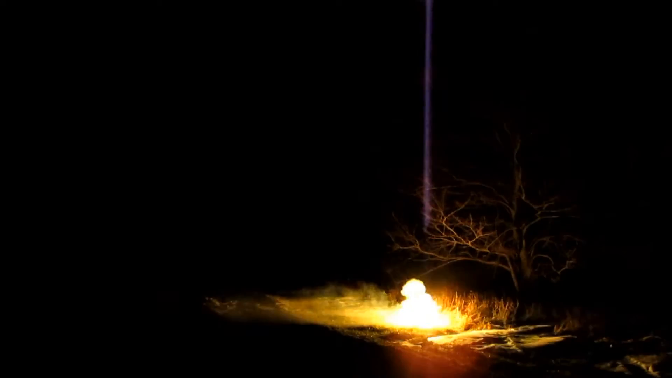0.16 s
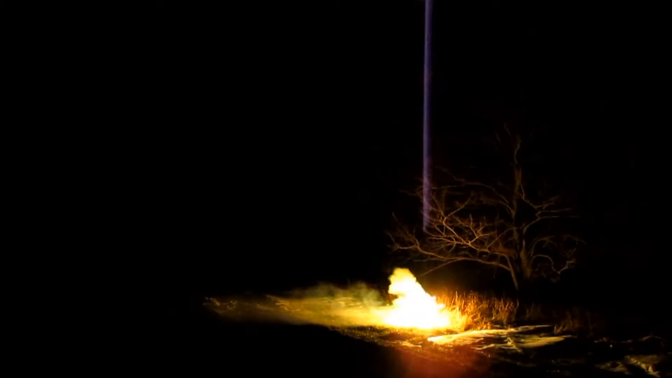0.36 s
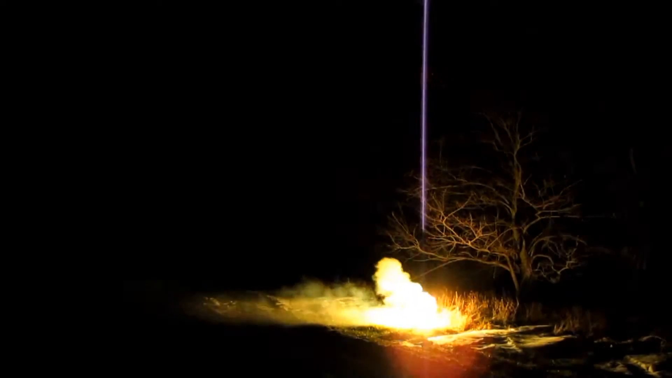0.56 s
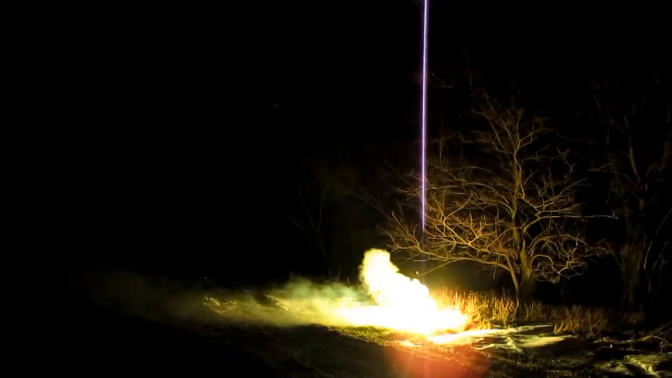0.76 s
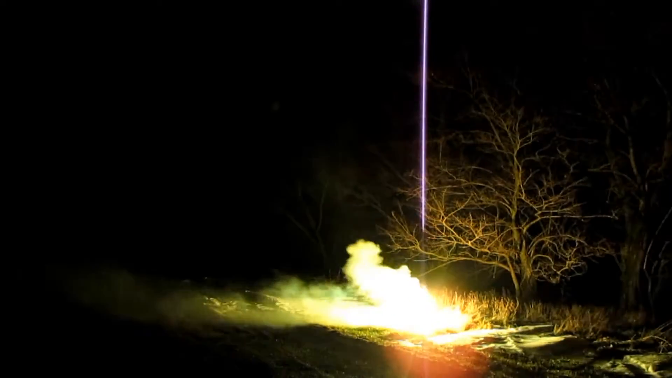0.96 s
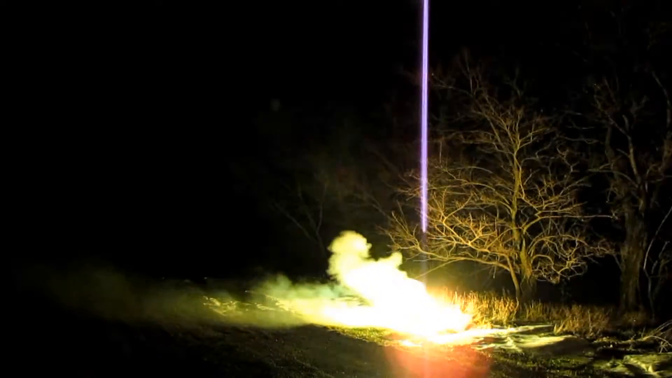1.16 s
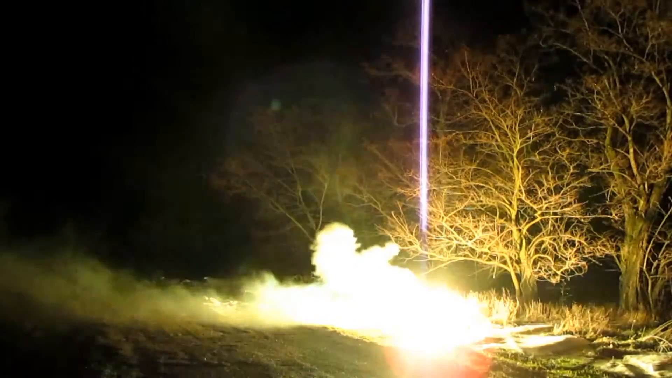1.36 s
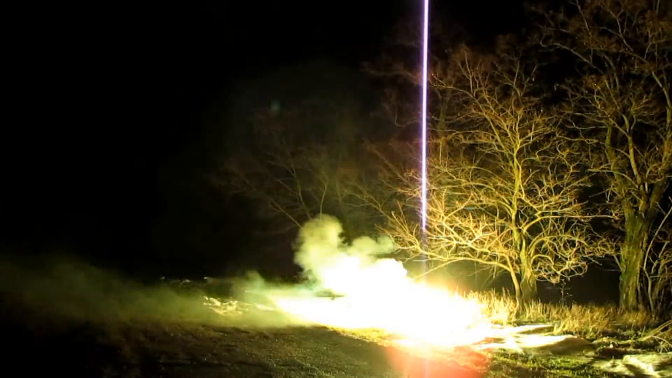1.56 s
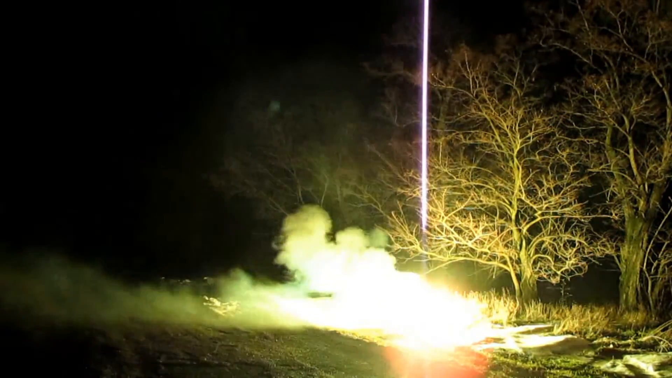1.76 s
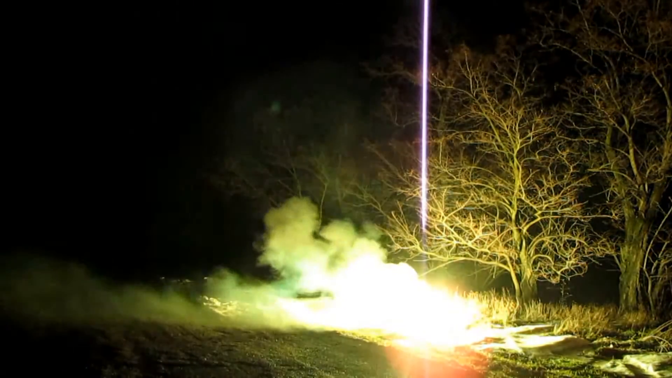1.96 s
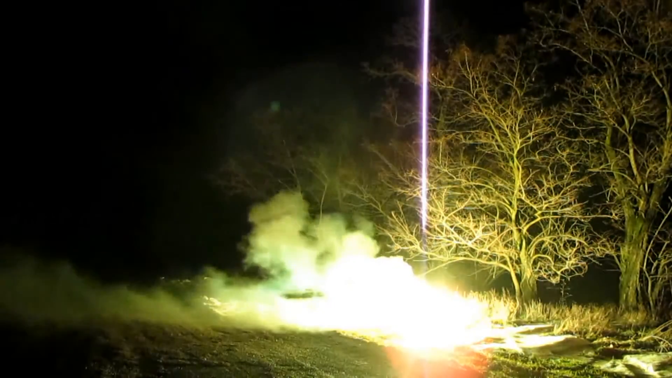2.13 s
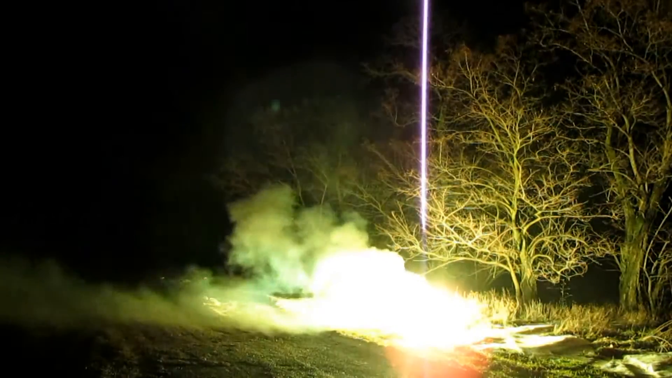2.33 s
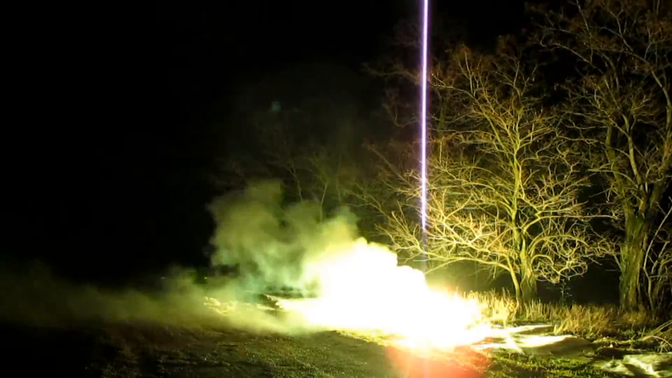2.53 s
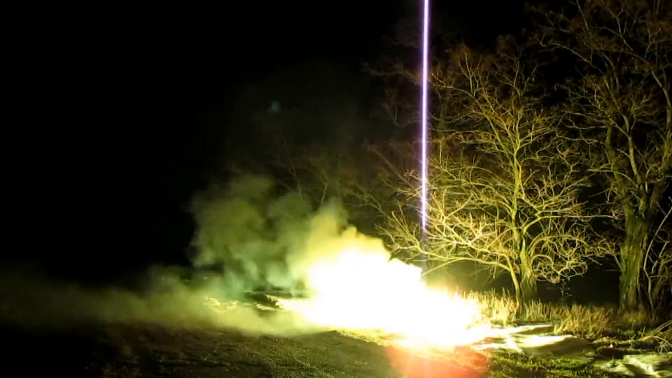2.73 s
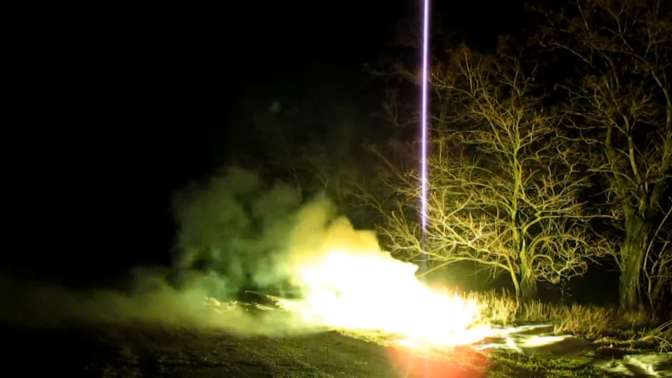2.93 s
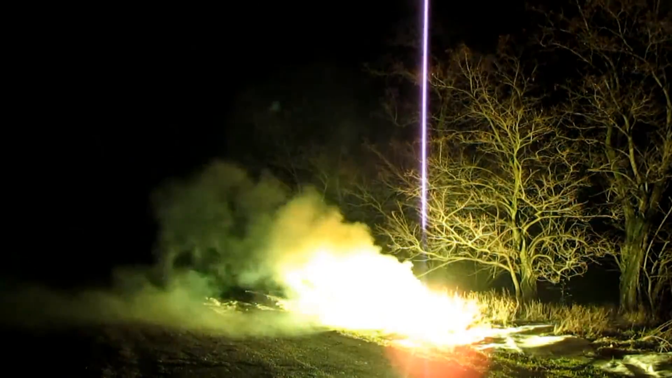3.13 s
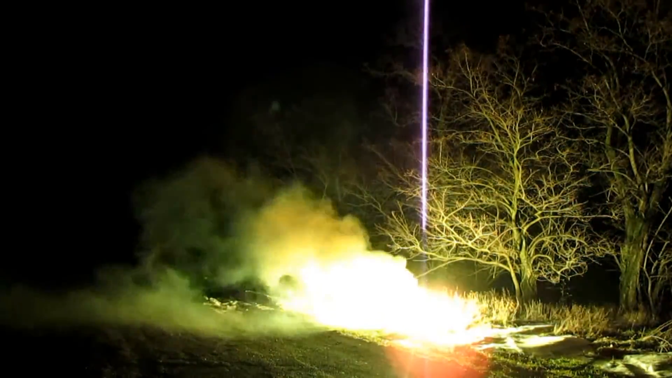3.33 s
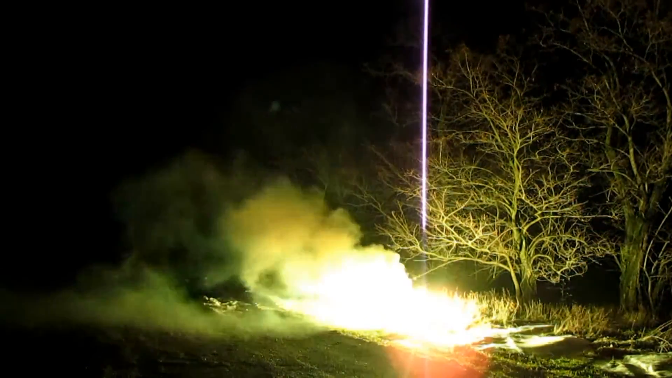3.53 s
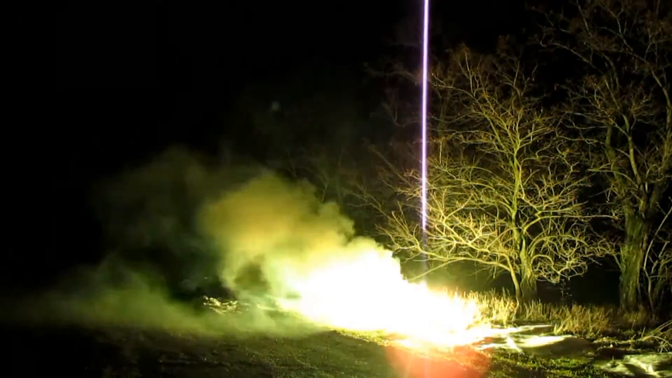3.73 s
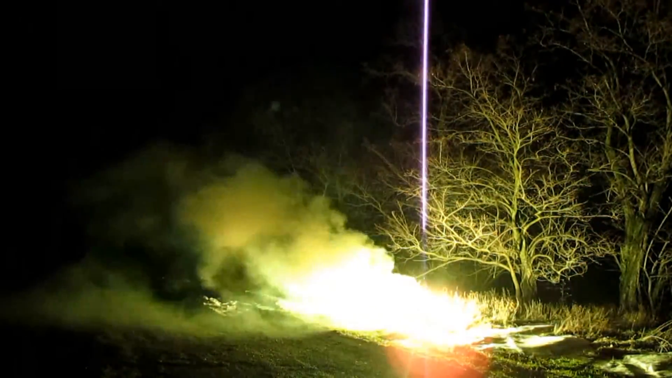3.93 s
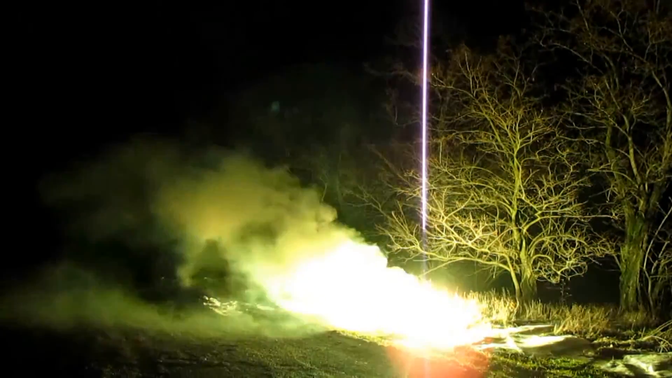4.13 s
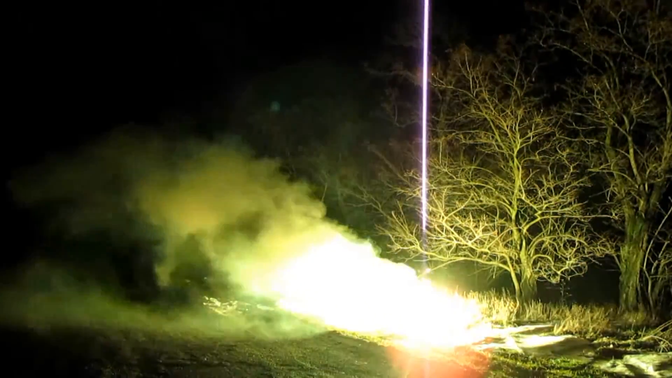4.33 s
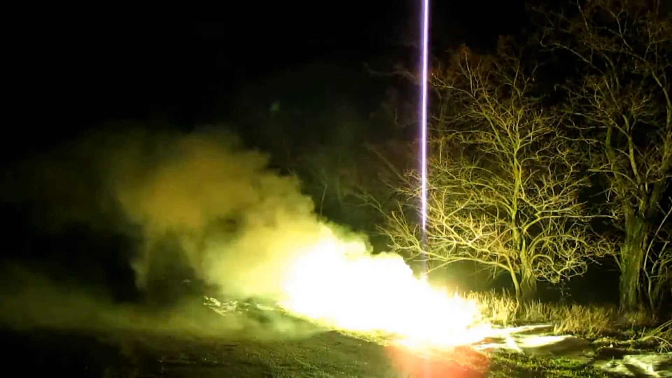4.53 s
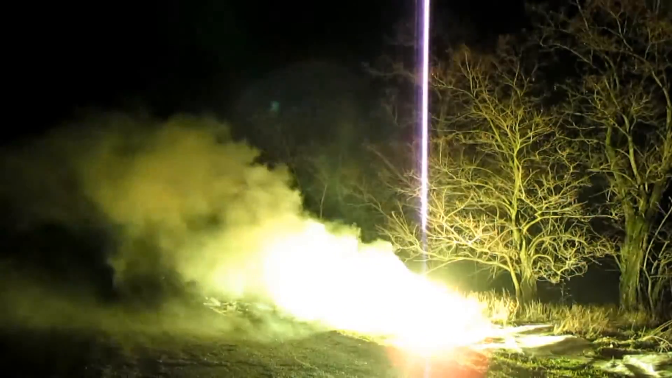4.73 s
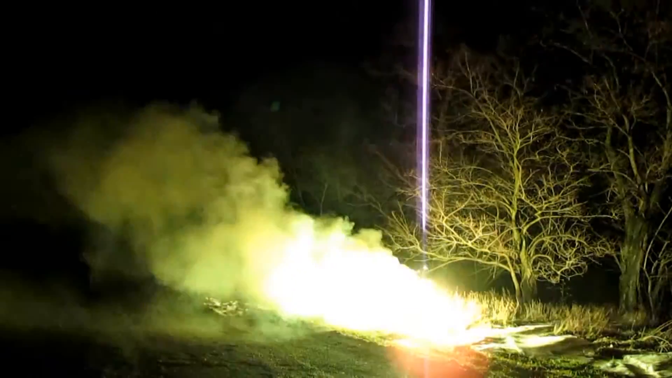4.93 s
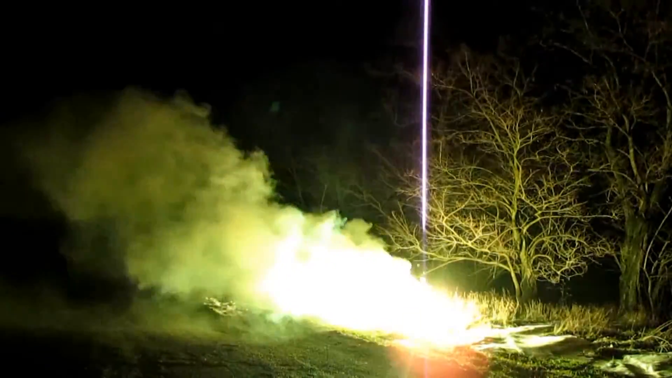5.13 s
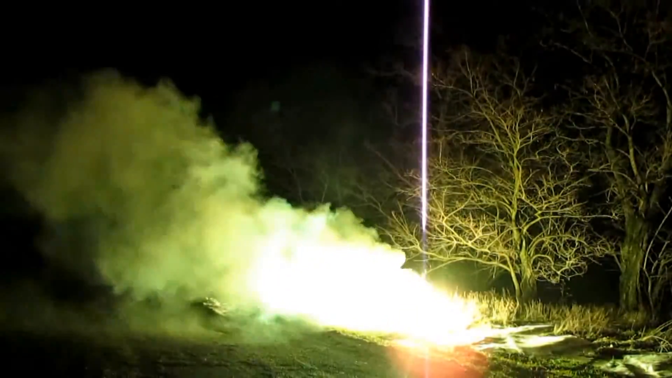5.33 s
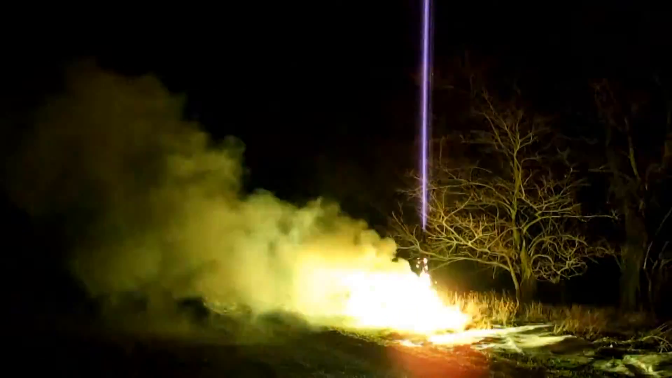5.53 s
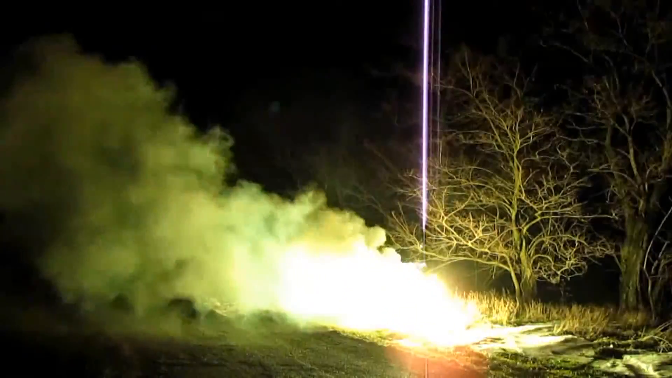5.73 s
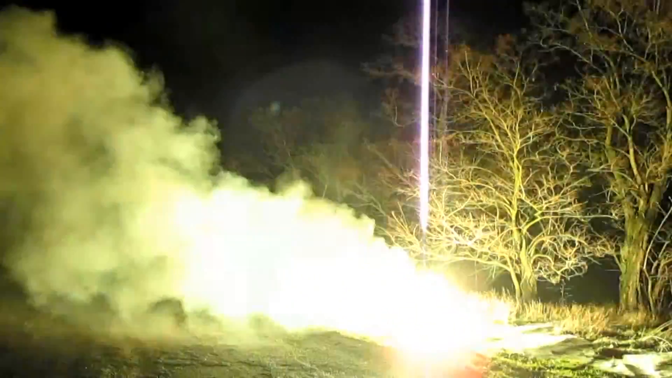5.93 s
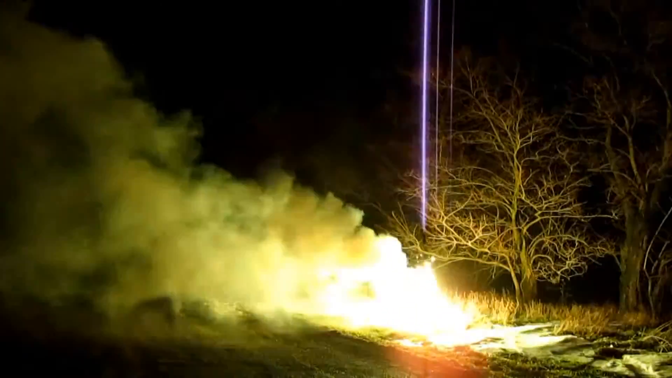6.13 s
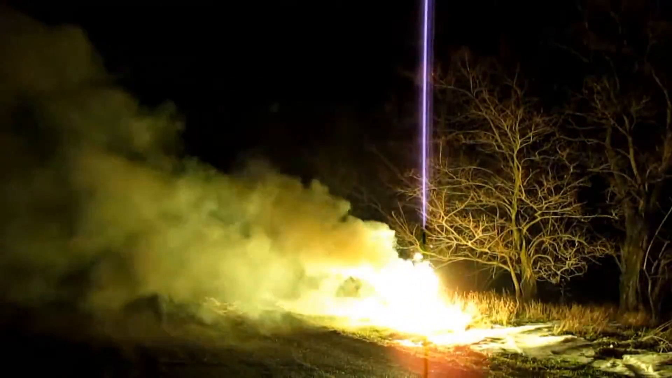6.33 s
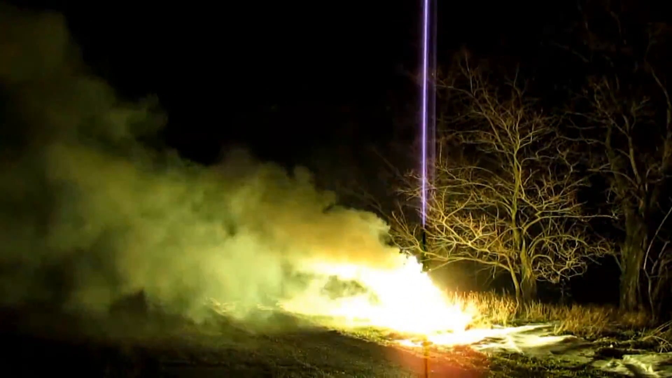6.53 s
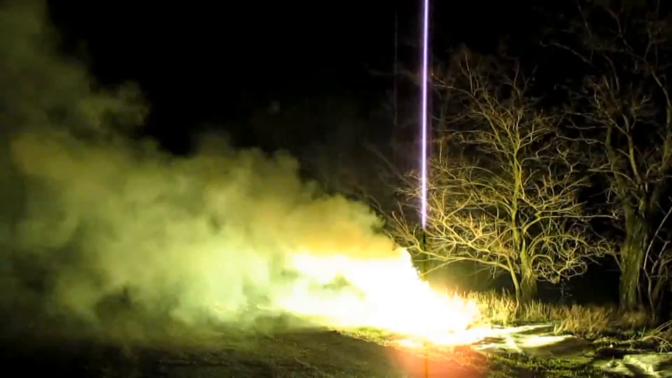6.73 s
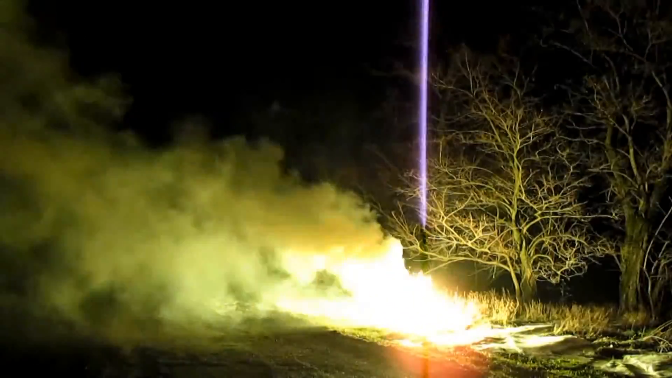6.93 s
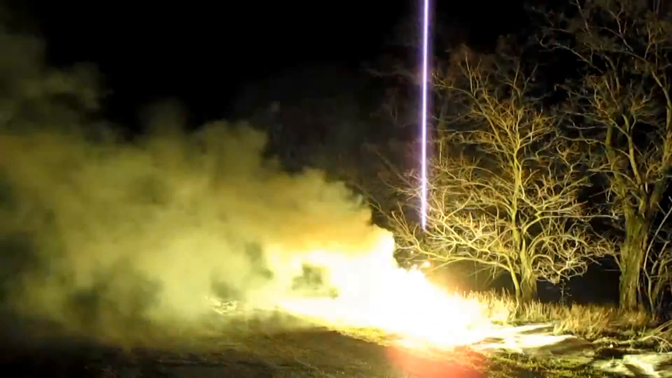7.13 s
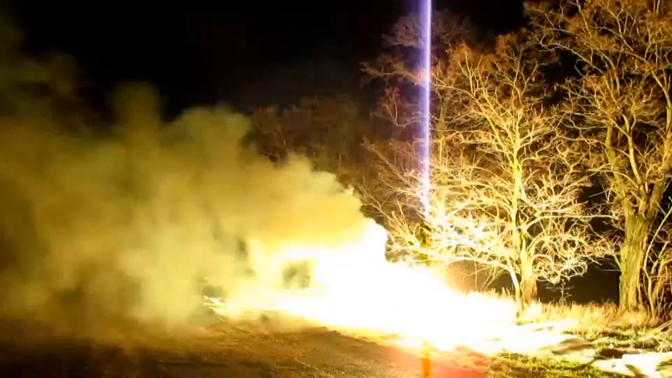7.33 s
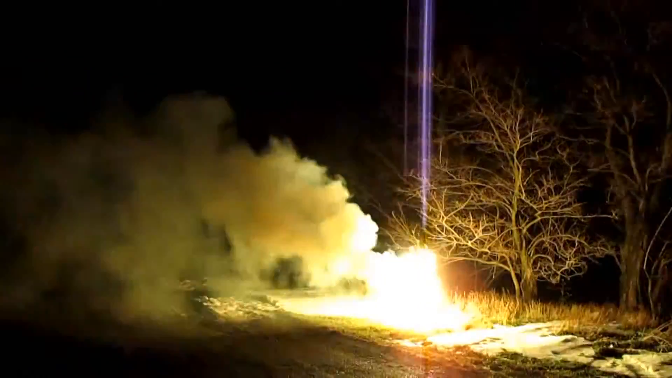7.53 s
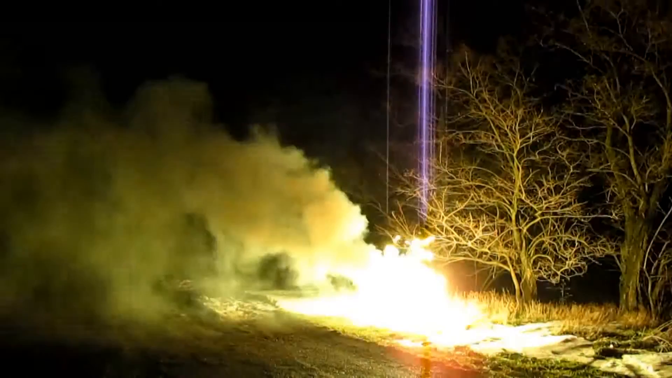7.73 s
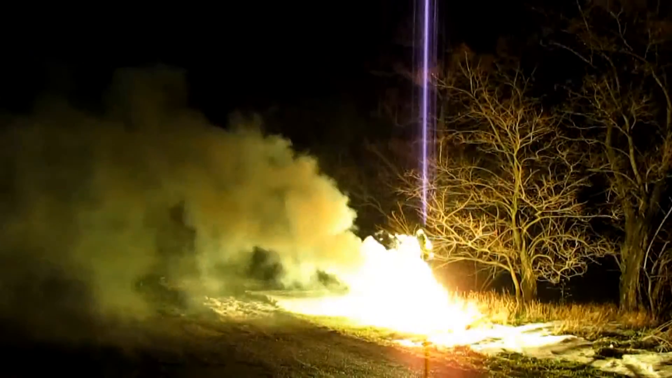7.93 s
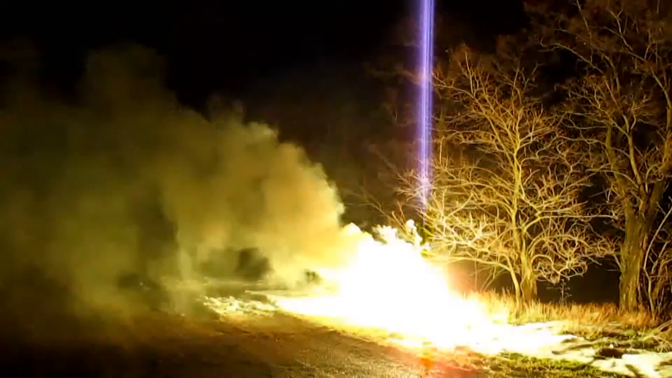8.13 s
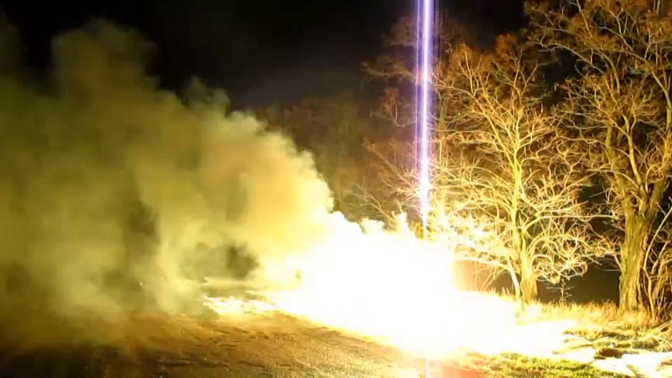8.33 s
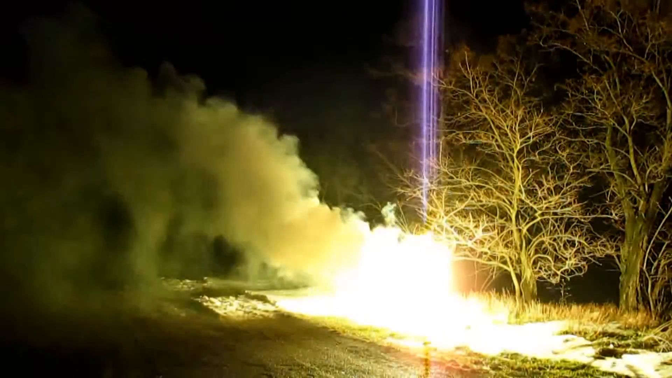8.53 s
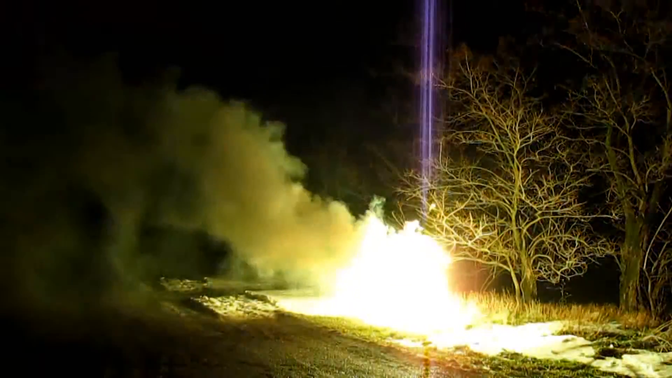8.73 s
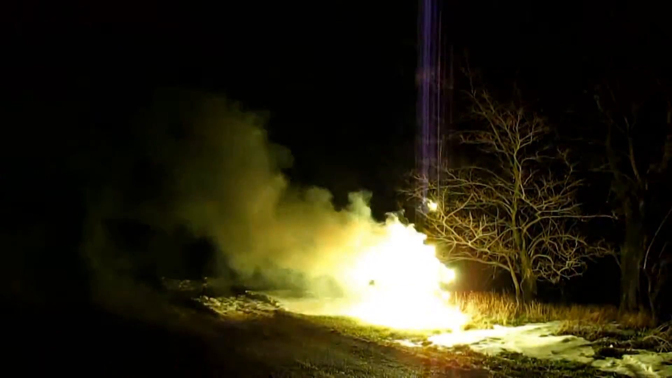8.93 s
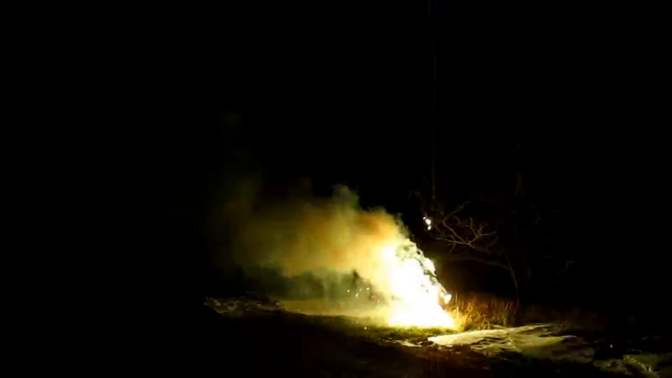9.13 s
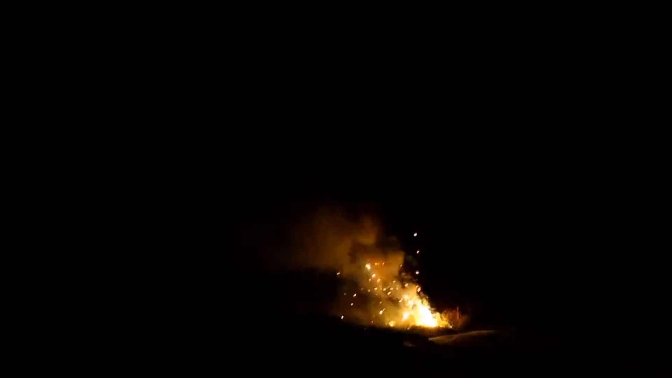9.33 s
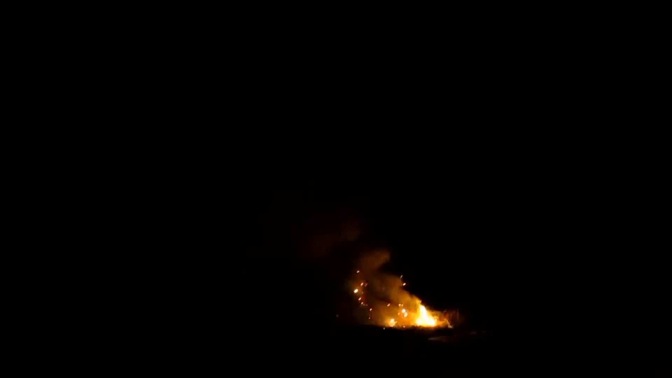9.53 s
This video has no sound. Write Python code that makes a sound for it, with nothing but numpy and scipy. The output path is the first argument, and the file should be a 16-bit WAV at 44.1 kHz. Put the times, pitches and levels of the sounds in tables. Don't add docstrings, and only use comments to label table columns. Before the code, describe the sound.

Dense crackling gas hiss and low flame roar from a burning flare, growing rougher and louder over nine seconds before cutting off to near silence.

```python
import sys
import numpy as np
from scipy import signal
from scipy.fft import rfft, irfft, next_fast_len
from scipy.io import wavfile

SR = 44100
rng = np.random.default_rng(int(sys.argv[2]) if len(sys.argv) > 2 else 0)


def file_out(sig):
    cols = np.atleast_2d(sig).T
    lim = np.clip(cols, -1, 1)
    pcm = np.round(lim * 32767).astype(np.int16)
    wavfile.write(sys.argv[1], SR, pcm)


def volts_from_db(level):
    exponent = np.asarray(level, float) / 20
    return 10 ** exponent


N = 422125
SIZE = next_fast_len(N + 4096)
HZ = np.maximum(np.arange(SIZE // 2 + 1) * SR / SIZE, 1)
CONTROL_STEP = 64


def rms_one(x):
    return x / np.sqrt(np.mean(x ** 2) + 1e-20)


def at_hz(points, hz):
    points = np.array(points)
    return np.interp(np.log(hz), np.log(points[:, 0]), points[:, 1])


def drift(rate_hz):
    r = np.exp(-2 * CONTROL_STEP * np.pi * rate_hz / SR)
    noise = rng.standard_normal(N // CONTROL_STEP + 1502)
    settled = signal.lfilter([1], [1, -2 * r, r * r], noise)[1500:]
    return rms_one(settled)


def humps(t, start, rise, end, fall, db):
    up = (t[:, None] - start) / np.maximum(rise, .005)
    down = 1 - (t[:, None] - end) / max(fall, .005)
    return np.clip(np.minimum(up, down), 0, 1) @ db


# (frequency [Hz], likeness [0-1])
PORT_LIKENESS = [(30, 0.4), (80, 0.86), (130, 0.98), (290, 0.99), (640, 0.96), (1200, 0.77), (3000, 0.94),
                 (8000, 1), (14000, .87)]
# (frequency [Hz], left over right [dB])
BODY_SHADE = [(60, -3), (110, 1.5), (200, 0), (380, 1), (700, 1), (1290, -1.0), (2380, -2.5), (4400, -2),
              (8120, -1.5), (15000, -3.5)]


def ports(shared, own):
    left_lag_s = 3.7e-5
    alike = np.clip(at_hz(PORT_LIKENESS, HZ), 0, 1)
    common = np.sqrt(.5 + .5 * alike) * shared
    unlike = np.sqrt(.5 - .5 * alike) * own * [[1], [-1]]
    shade = volts_from_db(at_hz(BODY_SHADE, HZ) / 2)
    left = shade * np.exp(-2j * np.pi * HZ * left_lag_s)
    return (common + unlike) * [left, 1 / shade]


# (time [s], pressure as hiss level [dB], plume breadth as flanks over core [dB])
JET = [(0, -42, -3), (.2, -42.5, -7), (.55, -41.5, -7), (1.2, -41, -6.5), (1.678, -40, -4.5),
       (2.02, -38, -6.5), (2.13, -35.5, -5), (3.0, -35.5, -11), (4.35, -38, -6), (4.65, -36, -4.5),
       (5.3, -36, -3.5), (6.9, -38, -0.5), (7.7, -33, -0.5), (8.1, -33, -1.5), (8.65, -28.5, -1),
       (9.19, -36.5, -1), (9.33, -44, -1.5), (9.57, -51, -6)]
# (time [s], roar level [dB])
FLAME = [(0, -47.5), (.55, -45.5), (1.3, -45), (2, -46), (2.85, -46), (2.95, -46), (4, -42), (4.5, -40.5),
         (5.6, -42), (6.2, -41), (7.5, -41.5), (8.3, -36.5), (8.85, -38), (9.19, -45), (9.33, -48.5),
         (9.57, -56)]
# (start [s], length [s], pressure change [dB], extra sizzle [dB])
SPURTS = [(.05, .07, -2.5, 3), (0.226, 0.22, 3.5, 2), (.67, 0.059, 1, 1), (1.232, .04, 2.5, 4),
          (1.28, .09, -0.5, 4.5), (1.376, .11, 3.5, 2), (1.74, 0.29, 0, 2), (2.696, 0.069, 0.5, -3),
          (2.84, 0.11, -0.5, 4), (3.275, .08, -2, 0), (3.39, 0.14, 1, 2), (4.057, 0.12, 2.5, -1.5),
          (4.53, 0.014, 1, 4), (4.72, .1, 1.5, 1.5), (5.493, 0.03, 2.5, -2.5), (5.958, 0.035, 1.5, -0.5),
          (6.01, .05, 2.5, 0), (6.116, 0.059, 2.5, 1), (6.194, 0.37, 2, -0.5), (6.79, .06, 0.5, -0.5),
          (6.978, .05, 2, -0.5), (7.84, 0.037, -2, -2), (8.037, 0.039, 0, -1.5), (5.027, .44, -2, -.5),
          (7.077, .25, 0.3, -2), (2.04, .13, 1.5, -0.6), (0.624, 0.44, 0.9, 1), (1.606, 0.11, -0.5, -2.5),
          (8.12, 0.11, -0.3, 2.5)]
# (blow-out time [s], build-up [s], gain [dB])
SWELLS = [(.3, 0.089, 2), (1.25, 0.68, 3.5), (1.25, .34, 1.5), (4.38, 0.24, 1.5), (4.79, 0.058, 1),
          (5.12, 0.15, 3), (5.33, 0.21, 2), (5.55, 0.23, 4), (6.07, 0.34, 4.5), (6.37, 0.065, 3),
          (6.5, .08, 0.5), (6.99, 0.54, 3), (2.99, 0.11, 1.5), (7.26, .12, 5.5), (7.4, 0.12, 5.5),
          (7.76, 0.24, 3), (8.0, .12, 1.5), (8.11, 0.056, -2), (8.3, 0.1, 4), (8.45, 0.15, 3.5),
          (8.76, 0.22, 5.5), (8.52, 0.086, 3.5), (9.09, .08, 2.5)]
# (time [s], echo strength [0-1], shade [dB])
SNOW_BANK = [
    (3.0, .06, -0.5),
    (3.55, .03, -1),
    (3.7, .5, -3.5),
    (3.93, 0.5, -7.5),
    (4.06, 0.3, -0.1),
    (4.4, .07, 0),
]


def burn(t):
    s, pressure, breadth = np.transpose(JET)
    pressure = np.interp(t, s, pressure)
    breadth = np.interp(t, s, breadth)
    flame = np.interp(t, *np.transpose(FLAME))

    start, length, push_db, sizzle_db = np.transpose(SPURTS)
    rise_s, fall_s = 0.018, 0.027
    push = humps(t, start, rise_s, start + length, fall_s, push_db)
    sizzle = humps(t, start, rise_s, start + length, fall_s, sizzle_db)

    end, build, gain = np.transpose(SWELLS)
    rise_share, blow_out_s = 0.29, 0.019
    swell = humps(t, end - build, rise_share * build, end, blow_out_s, gain)

    s, _, shade = np.transpose(SNOW_BANK)
    shade = np.interp(t, s, shade)
    flank = pressure + 0.62 * shade
    lit = flank + 0.25 * (flame - flank)
    low_flank = lit - 4 + 0.75 * breadth + 0.42 * push + 0.37 * swell
    smoulder_db = -52
    return np.array([flame + swell,
                     np.maximum(low_flank, smoulder_db),
                     pressure + shade + push,
                     flank + breadth + push + sizzle])


def turbulence(crackle_per_s, spread_db, share):
    heights = volts_from_db(spread_db * np.minimum(rng.exponential(1, SIZE), 3))
    spikes = (rng.random(SIZE) < crackle_per_s / SR) * heights
    crackle = rms_one(spikes - spikes.mean())
    share = np.clip(share, 0, 1)
    return np.sqrt(1 - share) * rng.standard_normal(SIZE) + np.sqrt(share) * crackle


BURN_HZ = [
    450,
    1500,
    4300,
    10500,
]
# (frequency [Hz], density [dB per Hz])
GAS_COLOUR = [(25, -47), (60, -36.5), (127, -31.5), (240, -29), (500, -31), (800, -32.5), (1150, -33),
              (1700, -32.5), (2500, -32), (4000, -33.5), (7200, -31.5), (8500, -33.5), (13500, -36),
              (15700, -38)]


def flare(roar_flicker_db, jet_flicker_db, patch_db):
    steps = np.arange(N // CONTROL_STEP + 2) * CONTROL_STEP
    levels = burn(steps / SR)
    crackling = turbulence(crackle_per_s=900.0, spread_db=1.5, share=0.059)
    gas = ports(rfft(crackling), rfft(rng.standard_normal(SIZE)))
    gas = gas * volts_from_db(at_hz(GAS_COLOUR, HZ)) * np.sqrt(SR / 2)
    roar = drift(10.3)
    jet = 0.22 * drift(24.0) + 1.08 * drift(28.0)
    neighbour = drift(9.0)
    out = np.zeros((2, N))
    for centre in 25 * 2 ** np.arange(0, 10, .5):
        window = np.cos(np.pi / 2 * np.clip(2 * np.log2(HZ / centre), -1, 1))
        place = np.interp(np.log(centre), np.log(BURN_HZ), np.arange(4))
        weights = np.maximum(1 - np.abs(place - np.arange(4)), 0)
        jet_share = min(place, 1)
        flicker = (1 - jet_share) * roar_flicker_db * roar + jet_share * jet_flicker_db * jet
        own = drift(12.3)
        gain = volts_from_db(weights @ levels + flicker + patch_db * (own + neighbour))
        neighbour = own
        band = irfft(gas * window ** 2, SIZE)[:, :N]
        out += np.interp(np.arange(N), steps, gain) * band
    return out


def below(x, hz):
    return irfft(rfft(x, SIZE) * np.exp(-(HZ / hz) ** 4), SIZE)[:, :N]


def late(x, lag):
    return np.array([np.interp(np.arange(N) - lag, np.arange(N), c) for c in x])


# (time [s], first dip [Hz], echo strength [0-1], treble kept [0-1])
GROUND = [(0, 1410, 0.7, 0.1), (1.1, 1260, 0.39, .02), (2.3, 1260, 0.76, .02), (3.5, 1260, 0.83, .02),
          (4.2, 1180, 0.63, .02), (5.2, 1210, 0.58, .02), (6, 1090, 0.58, .02), (7, 1075, 0.62, .02),
          (8.049, 1050, 0.57, .02), (8.7, 920, 0.36, 0.2), (9.2, 920, 0.24, 0.1), (9.26, 2380, 0, .6),
          (9.35, 2500, 0.3, .95), (9.57, 2450, 0.7, 0.8)]


def ground(x):
    grass_hz, snow_hz, bank_spacing_hz = 1710, 4500, 1510
    t = np.arange(N) / SR
    s, dip_hz, strength, treble = np.transpose(GROUND)
    dull = below(x, grass_hz)
    bright = below(x, snow_hz) - dull
    kept = np.clip(np.interp(t, s, treble), 0, 1)
    echo = late(dull + kept * bright, np.interp(t, s, SR / (2 * dip_hz)))
    echo = np.clip(np.interp(t, s, strength), 0, 1) * echo

    s, edge_strength, _ = np.transpose(SNOW_BANK)
    edge = np.clip(np.interp(t, s, edge_strength), 0, 1) * late(bright, SR / bank_spacing_hz)
    return x + echo - edge


# (frequency [Hz], density [dB per Hz])
NIGHT_COLOUR = [(25, -6), (60, -2), (300, -8.5), (1200, -10.5), (1750, -15), (2300, -55), (4400, -28),
                (8000, -37), (16000, -42)]


def night_air():
    common, left, right = rng.standard_normal((3, SIZE))
    air = rfft([0.85 * common + left, 0.51 * common + right]) * volts_from_db(at_hz(NIGHT_COLOUR, HZ))
    return volts_from_db(-53.5) * rms_one(irfft(air, SIZE)[:, :N])


# (time [s], level [dB], resonance [Hz], decay by 60 dB [s])
PUFFS = [(0.834, -31, 315, 0.063), (0.944, -26, 330, 0.068), (1.126, -29, 240, 0.056),
         (4.345, -29, 290, 0.11), (4.775, -33, 236, 0.05), (5.3, -25, 313, 0.12), (5.504, -21, 230, 0.039),
         (5.775, -32.5, 288, 0.065), (6.019, -22, 270, 0.097), (6.05, -25, 120, 0.064),
         (6.425, -30.5, 230, 0.18), (6.654, -27, 310, 0.068), (7.188, -29, 252, 0.061),
         (7.217, -21, 443, 0.061), (7.322, -20, 200, 0.07), (7.37, -18.5, 160, 0.08),
         (8.066, -20.5, 423, 0.04), (8.21, -19, 307, 0.089), (8.278, -17, 268, 0.05),
         (8.734, -20, 290, 0.058), (9.027, -34, 230, 0.054), (9.072, -35, 227, 0.05),
         (7.331, -20, 220, .06), (7.355, -26, 420, 0.035), (7.376, -20, 190, 0.075), (7.955, -24, 300, .06),
         (8.071, -23, 110, .07), (8.395, -28, 260, .1), (8.605, -19, 330, .06), (6.339, -31, 250, .06)]


def puffs():
    length = 6000
    thumps_per_s, ring_width_hz = 260, 210
    t = np.arange(length) / SR
    r = np.exp(-np.pi * ring_width_hz / SR)
    dull_band = signal.butter(2, [75, 1150], "band", fs=SR, output="sos")
    out = np.zeros(SIZE)
    for s, db, hz, t60 in PUFFS:
        rough = rng.standard_normal(length)
        thumps = rng.random(length) < thumps_per_s / SR
        thumps[40] = True
        decay = volts_from_db(-60 * t / max(0.8 * t60, .02))
        drive = (0.14 * rough + thumps * (1 + 0.43 * rough)) * decay
        body = signal.lfilter([1, -.975], [1, -2 * r * np.cos(2 * np.pi * hz / SR), r * r], drive)
        body = signal.sosfilt(dull_band, body)
        at = round(s * SR)
        out[at:at + length] += volts_from_db(db - 5.0) * body / np.abs(body).max()
    unlike = np.roll(out, 900)
    return irfft(ports(rfft(out), rfft(unlike)), SIZE)[:, :N]


# (time [s], peak level [dB])
EMBERS = [
    (2.1044, -20),
    (9.4444, -37),
    (9.474, -20),
    (9.508, -21),
]


def embers():
    clicks = np.zeros(SIZE)
    for s, db in EMBERS:
        clicks[round(s * SR)] = volts_from_db(db + 4)
    snap = signal.sosfilt(signal.butter(1, [2500, 9000], "band", fs=SR, output="sos"), clicks)
    return irfft(ports(rfft(snap), 0), SIZE)[:, :N]


def scene():
    fire = flare(roar_flicker_db=0.63, jet_flicker_db=0.32, patch_db=0.32) + puffs()
    return ground(fire) + embers() + night_air()


def band_limit(x):
    return signal.sosfilt(signal.butter(12, 15770, fs=SR, output="sos"), x)


def record(dry):
    notch_hz, width_hz, depth = 7870, 250, .74
    b, a = signal.iirpeak(notch_hz, notch_hz / width_hz, fs=SR)
    wet = dry - depth * signal.lfilter(b, a, dry)
    wet = .6 * np.tanh(wet / .6)
    return band_limit(wet)


dry = scene()
out = record(dry)
file_out(out)
```